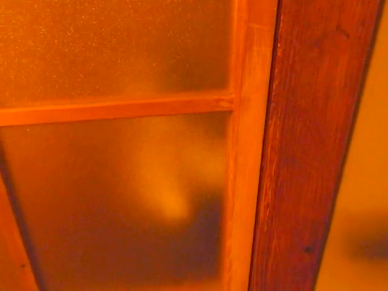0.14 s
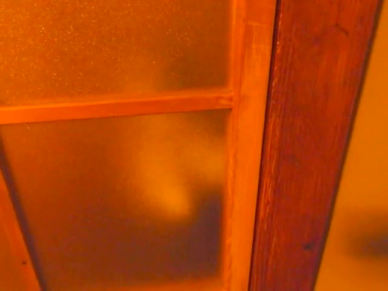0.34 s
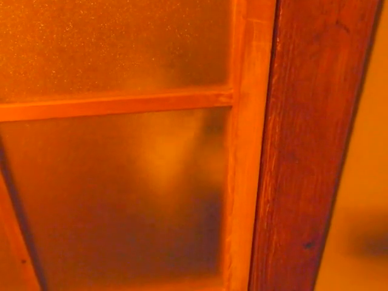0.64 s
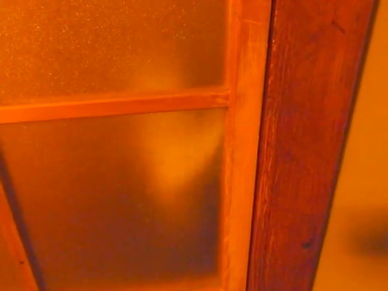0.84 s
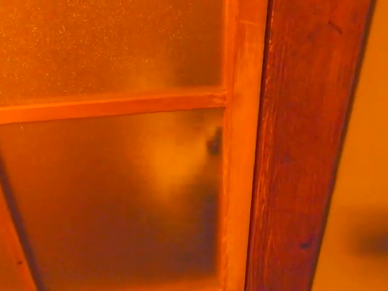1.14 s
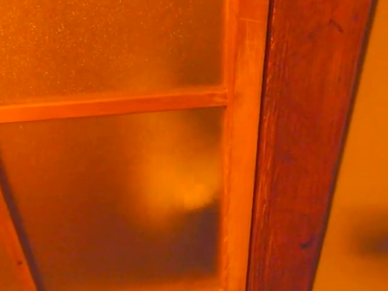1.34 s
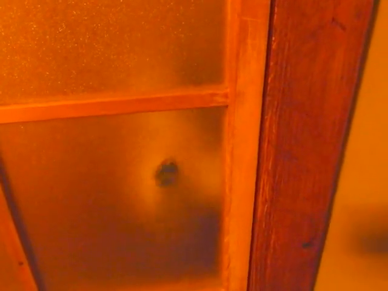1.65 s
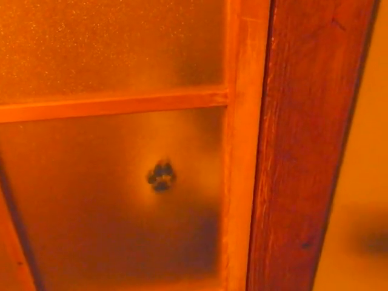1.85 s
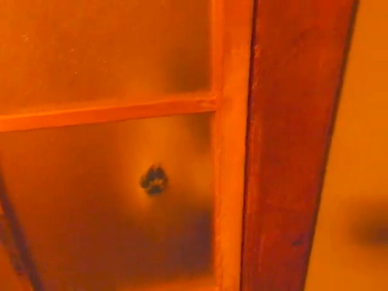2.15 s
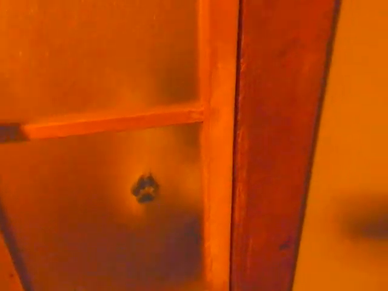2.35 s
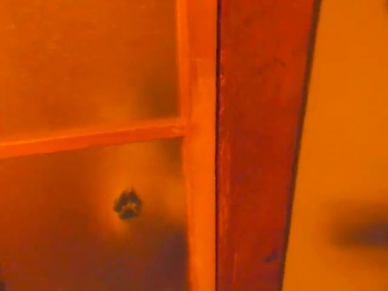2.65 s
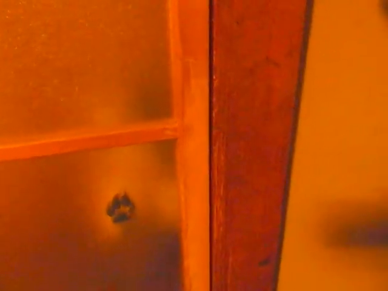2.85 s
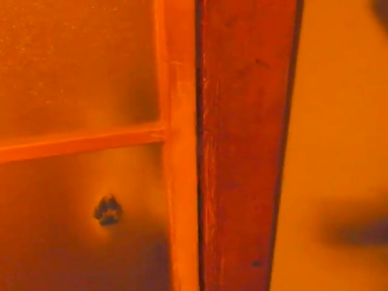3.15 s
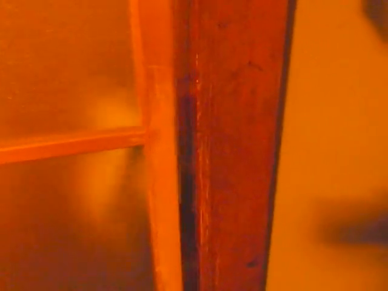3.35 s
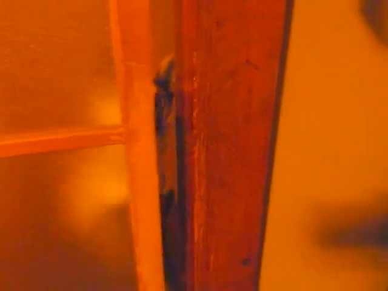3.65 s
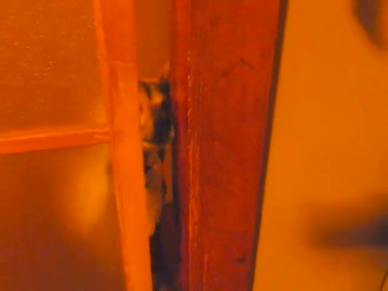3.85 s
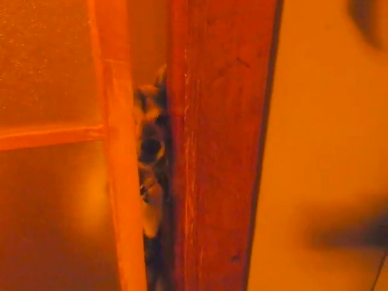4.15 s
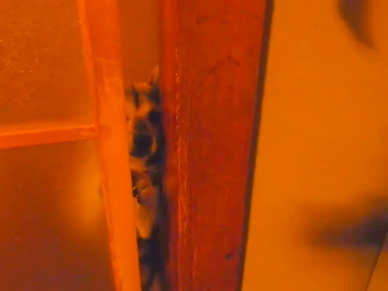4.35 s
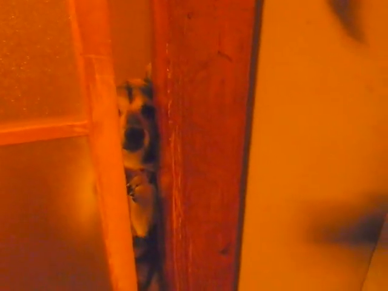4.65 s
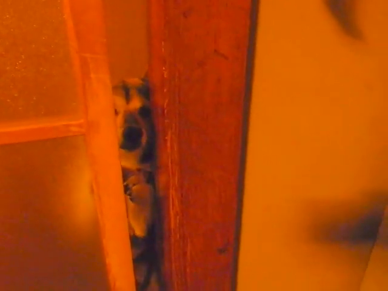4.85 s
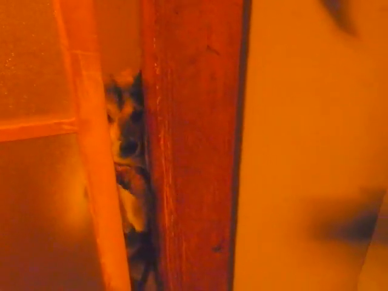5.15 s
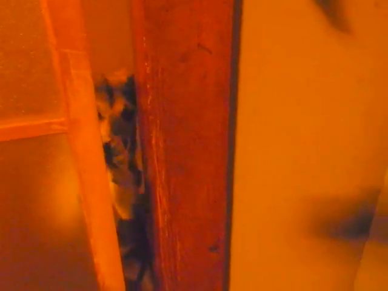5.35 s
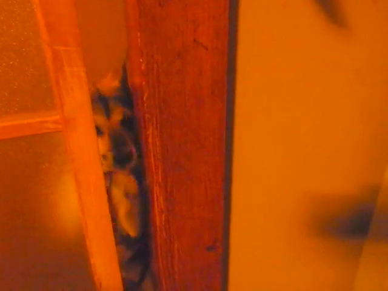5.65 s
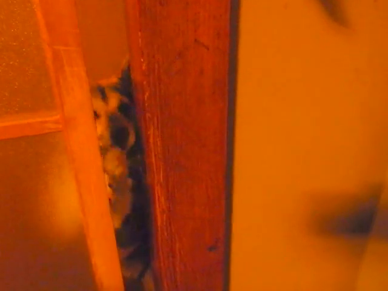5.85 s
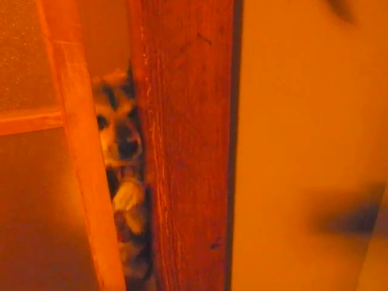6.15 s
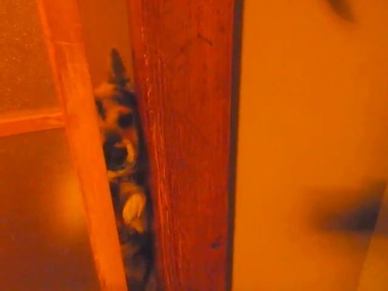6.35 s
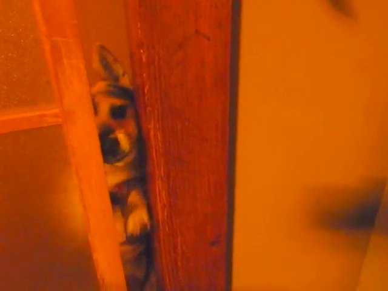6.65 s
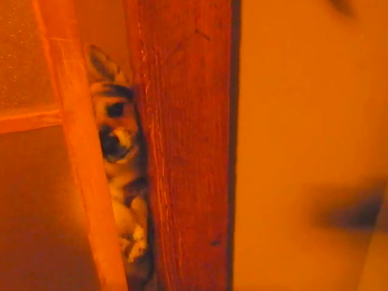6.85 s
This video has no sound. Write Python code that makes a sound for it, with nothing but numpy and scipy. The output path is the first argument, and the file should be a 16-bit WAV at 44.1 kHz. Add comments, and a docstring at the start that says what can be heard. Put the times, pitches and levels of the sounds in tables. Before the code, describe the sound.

Indoors and close to the microphone, a wooden sliding door with loose glass panes is pawed by a small dog. A tiny squeak and claw scrape accompany a busy run of rattles and clacks, then one short jolt, a pause, and the heaviest shove with low thump and juddering slide. After a second quiet gap come softer rubs and a few light knocks over low room tone.

```python
"""A wooden sliding door with loose glass panes is pawed at and shoved open in bursts by a small dog, in a quiet room.
Uneven jolts, driven by each push, ring the damped modes of the swaying leaf, the juddering wood and the panes.
Noise bursts clack on the same wood and glass, a paw pad squeaks in overtones and claws scrape as narrow noise.
Placed close to two neighbouring microphone ports, over a steady room tone, with short reflections behind."""
import sys
import numpy as np
from scipy import signal
from scipy.fft import rfft, irfft
from scipy.io import wavfile
from scipy.ndimage import uniform_filter1d

SR = 44100
rng = np.random.default_rng(int(sys.argv[2]) if len(sys.argv) > 2 else 0)


def wav_out(sig):
    """Save sig, one row per channel (or a flat mono array), as 16-bit PCM at SR to the path in sys.argv[1]."""
    wavfile.write(sys.argv[1], SR, np.round(np.clip(np.atleast_2d(sig).T, -1, 1) * 32767).astype(np.int16))


N = 308259

# room tone before it is set to its overall level: [pitch_hz, relative_level_db]
AIR_SPECTRUM = [(25, -3.5), (117, 2.5), (335, -16.5), (372, -7), (410, -15), (2110, -25.5), (5000, -32),
                (6380, -42.5), (16000, -53.5)]
# likeness of the room tone at the two ports: [pitch_hz, likeness_0_to_1]
AIR_LIKENESS = [(60, 0.79), (950, 0.48), (15000, 0.45)]
AIR_RMS_DB = -51.5

# pushes on the door: [start_s, build_up_s, hold_s, sway_of_leaf_db, judder_of_wood_db, chatter_of_panes_db,
# pane_brightness_db_per_octave]; the levels are those reached at the end of the build-up
PUSHES = [(0.577, 0.26, 0.005, -70, -55.5, -57, 3), (0.793, 0.013, 0.041, -27, -39, -46.5, 4),
          (0.82, 0.11, 0.12, -26, -26.5, -30.5, -2), (1.062, 0.037, 0.095, -35, -34, -31, -5),
          (1.142, 0.18, 0.067, -29, -34.5, -39.5, 1.3), (1.41, 0.0042, 0.11, -25, -25, -31.5, -5.5),
          (1.687, 0.068, 0.15, -44, -49, -58.5, 1), (1.918, 0.011, 0.08, -33, -40.5, -55.5, -9),
          (2.325, 0.0049, 0.026, -29, -29.5, -37, -9), (2.325, 0.044, 0.0025, -30, -20.5, -23.5, -1.5),
          (3.221, 0.16, .003, -38, -49, -49.5, 0), (3.34, 0.017, 0.22, -27, -25, -29, -0.8),
          (3.583, 0.067, 0.033, -27.5, -35.5, -42.5, -3), (3.64, 0.19, 0.041, -37, -33.5, -35, -0.4),
          (3.885, 0.028, 0.24, -34.5, -42.5, -55, -1.5), (4.108, 0.11, 0.069, -42.5, -51.5, -54.5, -0.5),
          (5.137, 0.17, 0.034, -48.5, -59, -60, -1), (5.405, 0.1, 0.18, -34, -43, -45.5, 3.5),
          (5.665, 0.27, 0.033, -42.5, -46, -50, 4.5), (5.912, 0.15, 0.33, -37, -45.5, -52.5, 2.5),
          (6.414, 0.081, 0.075, -40, -54.5, -69.5, 5), (6.725, 0.026, 0.021, -55, -70, -53, 0.5),
          (6.765, 0.0057, 0.01, -59, -55, -43.5, -1)]
BUILD_DB = 10  # climb during the build-up
# the next five rows each hold three values: leaf, wood, panes
SAG_DB_PER_S = (9, 29.5, 33)  # weakening while the push is held
LET_GO_DB_PER_S = (168, 234, 254.5)  # first quick fall when the paw lets go
SETTLE_DB = (-10, -27, -21)  # where the slower rocking to rest begins, relative to the push
SETTLE_DB_PER_S = (31.5, 135, 188)  # fall of that rocking
REST_DB = (-95, -66.5, -71.5)  # faint constant trembling
REST_BRIGHT_DB = -4.5  # pane brightness of the trembling, dB per octave

# bending modes of the door leaf: [pitch_hz, width_hz, level_db]
LEAF_MODES = [(59.5, 14.7, 0.5), (78.5, 15.4, 0), (113.5, 17, -2.5), (169, 69, -6.5)]
# modes of the wooden bars: [pitch_hz, width_hz, level_db]
WOOD_MODES = [(229, 151, 2), (372, 67.6, 4), (617, 230, -0.5), (902, 292, -4), (1112, 280, -8)]
# modes of the glass panes: [pitch_hz, width_hz, level_db]
PANE_MODES = [(1360, 216, 4), (1745, 323, 4.5), (2052, 260, 6.5), (2375, 324, 5.5), (2955, 554, 3),
              (3604, 400, 3), (4100, 510, -1), (4650, 330, 0), (5280, 420, -2), (5840, 450, -3),
              (6910, 960, -8), (9570, 2600, -16), (12160, 3900, -23)]
LINGER, LINGER_DB = 3, -16  # each mode has a core up to this many times narrower that rings on, and its level
RUB_DB, KNOCK_DB = -51.5, -34  # panes rub smoothly under the first chatter level, knock loosely over the second
# the dog rubs the edge of the door once it stands ajar, which recolours wood and panes: [pitch_hz, gain_db]
RUB_TONE = [(650, -0.5), (1000, -5), (1345, 8.5), (2800, 0), (4650, -2)]
AJAR_S = 5

# short, narrow scrapes of claw on glass: [start_s, length_s, centre_hz, width_hz, level_before_shaping_db]
SCRAPES = [(0.327, 0.053, 3220, 500, -61), (1.082, 0.078, 2990, 490, -29)]
# wet paw pad on glass: [time_s, slip_rate_hz, level_db], before the random wobble of both
SQUEAK_PATH = [(0.671, 1180, -59), (0.683, 1160, -50.5), (0.712, 1142, -46), (0.727, 946, -47.5),
               (0.756, 932, -47), (0.772, 870, -60)]
# strength of the squeak's overtones: [pitch_hz, level_db]
SQUEAK_TONE = [(1100, 1), (2100, -19), (2800, -3.5), (5500, -17), (5800, 0), (8000, -23.5)]

# clacks of pane, claw and frame, peaks as struck:
# [start_s, peak_db, body_at_1200_hz_and_below_db, edge_at_9000_hz_and_above_db, favoured_ring_hz]
CLACKS = [(0.7975, -24, -0.5, 9, 3110), (0.83, -25.5, 0, -4, 4640), (0.854, -23, 9, -8, 1690),
          (0.869, -30, -26, 7, 7400), (0.8904, -15, 1, -3, 2840), (0.9737, -11.5, -34, 2, 1660),
          (1.187, -13.5, -58, 2.5, 4380), (1.205, -25, -23.5, 10, 4280), (1.2439, -18, -62, 10.5, 5670),
          (1.2837, -22, 17, -20, 2860), (1.328, -29.5, -8, -15, 3400), (1.358, -21.5, -18, -15, 4000),
          (1.4064, -11, 10, -46, 2850), (1.491, -18, -15, -7, 1650), (1.752, -44, 17, 4, 1710),
          (1.8028, -33, -29, 9, 5600), (1.932, -35.5, 15, -9, 1570), (2.3283, -29, 2, -15, 1290),
          (2.357, -15, 25, -16, 724), (2.4995, -32.5, -6, 3, 3300), (2.88, -44, 4, 13.5, 2770),
          (2.994, -46.5, -22, 17, 2710), (3.3463, -15.5, -10, 10.5, 3200), (3.5162, -9, -35, 5, 2000),
          (3.6446, -22, 1, -7, 1230), (3.842, -14.5, 0.5, 8.5, 5230), (3.8485, -11, -28, 5, 5000),
          (3.894, -23.5, -28, -3, 1580), (4.14, -37, -43, 11.5, 3920), (5.253, -38, -11, -16, 4520),
          (5.5255, -16, -12, -5, 1860), (6.12, -23.5, 7.5, -24, 2680), (6.269, -22.5, 2, -31, 4740),
          (6.2772, -14.5, -4, -6, 5300), (6.769, -28.5, 0, -46, 3060), (6.786, -24, 6, -43, 2200)]
# sudden pushes that thump the whole leaf: [start_s, starting_level_db]
SHOVES = [(0.81, -23), (2.383, -13.5), (3.347, -7)]

# decay of the room's reflections: [pitch_hz, t60_s]
ROOM_DECAY = [(300, 0.39), (14000, 0.0056)]
# colour of the reflections heard oppositely at the two ports: [pitch_hz, gain_db]
PORT_DIFFERENCE = [(300, -49), (2000, -37.5), (4500, -17), (8000, -1.5), (15000, 3)]
# lean of the door group to the left: [pitch_hz, left_minus_right_db]
LEFT_LEAN = [(3500, 0.43), (9000, 3)]
NOTCH_HZ, NOTCH_Q = 2490, 15.4  # narrow dip of the microphone
BAND_EDGE_HZ = 16200


def gain_of(db):
    """Decibels to gain."""
    return 10 ** (np.asarray(db) / 20)


def evened(x):
    """Scales to rms 1."""
    return x / np.sqrt(np.mean(x ** 2) + 1e-20)


def read(points, hz):
    """Reads a spectrum table on a log-frequency axis."""
    f, value = np.transpose(points)
    return np.interp(np.log(hz + 1), np.log(f + 1), value)


def add(mix, s, sound):
    """Mixes a sound in at time s."""
    part = mix[round(s * SR):][:len(sound)]
    part += sound[:len(part)]


def coloured(x, points):
    """Applies a (Hz, dB) table along the last axis."""
    hz = np.fft.rfftfreq(x.shape[-1], 1 / SR)
    return irfft(rfft(x) * gain_of(read(points, hz)), x.shape[-1])


def room_tone():
    """Steady air and house rumble: shaped noise with slight drifting patches, partly alike in both ports."""
    frames, hz = N // 512 + 5, np.fft.rfftfreq(2048, 1 / SR)
    a, b, c, d, patches = rng.standard_normal((frames, 1025, 5)).T
    patches = uniform_filter1d(patches, size=20, axis=0)
    patches = evened(uniform_filter1d(patches, size=8, axis=1))
    same = np.clip(read(AIR_LIKENESS, hz), -1, 1)[:, None]
    left = a + 1j * b
    right = same * left + np.sqrt(1 - same ** 2) * (c + 1j * d)
    spectra = np.array([left, right]) * gain_of(read(AIR_SPECTRUM, hz)[:, None] + 1.5 * patches)
    air = signal.istft(spectra, nperseg=2048, noverlap=1536)[1][:, :N]
    return gain_of(AIR_RMS_DB) * evened(air)


def motion():
    """Adds the power of pushes that build, hold, let go and settle; the loudest chatter sets the brightness."""
    t = np.arange(0, N / SR + .01, .001)[:, None]
    power = gain_of(2 * np.array(REST_DB))[None]
    bright = REST_BRIGHT_DB * power[:, 2]
    for start, build, hold, *levels_db, bright_db in PUSHES:
        climb = (t - start) / build
        held = np.clip(t - start - build, 0, hold)
        since = np.maximum(t - start - build - hold, 0)
        let_go = gain_of(-since * LET_GO_DB_PER_S)
        settling = gain_of(SETTLE_DB - since * SETTLE_DB_PER_S)
        fall = let_go + settling * (1 - let_go)
        pressed_db = levels_db - BUILD_DB * (1 - np.clip(climb, 0, 1)) - held * SAG_DB_PER_S
        push = (climb > 0) * (gain_of(pressed_db) * fall) ** 2
        power = power + push
        bright = bright + bright_db * push[:, 2]
    curves = (*np.sqrt(power.T), bright / power[:, 2])
    return [np.interp(np.arange(N) / SR, t[:, 0], curve) for curve in curves]


def jolts(per_s, spread_db, spray_s, hiss, loose):
    """Uneven small impacts, each a quickly dying spray, over rubbing noise; loose=0 leaves an even rub."""
    size = gain_of(spread_db * np.minimum(rng.exponential(1, N), 4)) * (rng.random(N) < per_s / SR)
    sprays = signal.lfilter([1], [1, -np.exp(-1 / (spray_s * SR))], size)
    impacts = evened(sprays) + hiss
    return (loose * evened(impacts) + 1 - loose) * rng.standard_normal(N)


def drift(modes, depth_db, size):
    """Narrow modes swell and fade at random as the contact points wander; broad ones hold steadier."""
    steps = uniform_filter1d(rng.standard_normal((N // 64 + 2, len(modes))), size=size, axis=0)
    at = np.arange(N) / 64  # one random step every 64 samples
    return [np.interp(at, np.arange(len(v)), depth_db * min(1, 400 / w) * evened(v))
            for v, (hz, w, db) in zip(steps.T, modes)]


def ring(x, modes, shades_db, linger_db=LINGER_DB):
    """Drives each damped mode with x times its own gain; an rms of 1 in gives about 1 out."""
    t, out, energy = np.arange(5000) / SR, 0, 0
    for k, ((hz, w, db), shade_db) in enumerate(zip(modes, shades_db)):
        core = gain_of(linger_db) / LINGER * np.exp(-np.pi * max(w / LINGER, 14) * t)
        dying = np.exp(-np.pi * w * t) + core
        mode = (-1) ** k * gain_of(db) * w * dying * np.sin(2 * np.pi * hz * t)
        out = out + signal.oaconvolve(x * gain_of(shade_db), mode)[:len(x)]
        energy += np.sum(mode ** 2)
    return out / np.sqrt(energy)


def door():
    """Jolts in the track shake the leaf and its wooden bars, and ticks in the grooves shake its panes."""
    sway, judder, chatter, bright_db = motion()
    ajar = np.arange(N) > AJAR_S * SR
    loose = np.interp(20 * np.log10(chatter), (RUB_DB, KNOCK_DB), (0, 1))
    bumps = jolts(per_s=220, spread_db=2.2, spray_s=0.0015, hiss=1.2, loose=loose)
    ticks = jolts(per_s=260, spread_db=2.8, spray_s=0.0012, hiss=0.7, loose=loose)  # loose panes knock
    pane_shades = [d + bright_db * np.log2(hz / 2800) + ajar * read(RUB_TONE, hz)
                   for d, (hz, w, db) in zip(drift(PANE_MODES, depth_db=2.5, size=16), PANE_MODES)]
    wood_shades = [d + ajar * read(RUB_TONE, hz)
                   for d, (hz, w, db) in zip(drift(WOOD_MODES, depth_db=2.5, size=20), WOOD_MODES)]
    leaf = ring(sway * bumps, LEAF_MODES, drift(LEAF_MODES, depth_db=2.0, size=60))
    wood = ring(judder * bumps, WOOD_MODES, wood_shades)
    panes = ring(chatter * ticks, PANE_MODES, pane_shades)
    return leaf, wood + panes


def claw_scrapes():
    """Claws scrape the glass: low noise shifted up to a narrow band, swelling and fading."""
    out = np.zeros(N)
    for s, length, centre_hz, width_hz, db in SCRAPES:
        n = int(length * SR)
        lowpass = signal.butter(3, width_hz / SR, output="sos")
        fuzz = signal.sosfilt(lowpass, rng.standard_normal(8192))
        carrier = np.sin(2 * np.pi * centre_hz * np.arange(n) / SR)
        add(out, s, gain_of(db) * evened(fuzz[-n:]) * carrier * np.hanning(n))
    return out


def pad_squeak():
    """Regular stick-slip of the paw pad on glass gives a stack of overtones with unsteady pitch and level."""
    out, (s, hz, db) = np.zeros(N), np.transpose(SQUEAK_PATH)
    t = np.arange(s[0], s[-1], 1 / SR)
    wobble = 1 + 0.07 * uniform_filter1d(rng.standard_normal(len(t)), size=150)
    pitch = np.interp(t, s, hz) * wobble
    turns = np.cumsum(pitch) / SR
    stack = sum(gain_of(read(SQUEAK_TONE, k * pitch)) * np.cos(2 * np.pi * k * turns) for k in range(1, 13))
    flutter_db = 2.6 * evened(uniform_filter1d(rng.standard_normal(len(t)), size=90))
    level = gain_of(np.interp(t, s, db) + flutter_db)
    add(out, s[0], level * stack * signal.windows.tukey(len(t), .1))
    return out


def clacks():
    """A tick, a short crack and a fading spray of rebounds ring wood and glass, favouring modes near one pitch."""
    out, t = np.zeros(N), np.arange(8192) / SR
    sprays = rng.standard_normal((len(CLACKS), len(t)))
    fade = np.exp(-t / 0.0096) + gain_of(-18.5 - 60 * t / 0.33)  # crack, then rebounds
    for (s, db, body_db, edge_db, loud_hz), spray in zip(CLACKS, sprays):
        tilt = [(1200, body_db), (2500, 0), (6000, 0.022), (9000, edge_db)]  # (Hz, dB)
        struck = WOOD_MODES + PANE_MODES + [(loud_hz, 250, 0)]
        hz = np.transpose(struck)[0]
        favour_db = 5 * np.exp(-(np.log(hz / loud_hz) / 0.2) ** 2)
        tick = 14 * (t == 0)
        sound = ring(spray * fade + tick, struck, read(tilt, hz) + favour_db, linger_db=-50)
        add(out, s, gain_of(db) * sound / abs(sound).max())
    return out


def thumps():
    """A sudden push thumps the whole leaf: a 50 Hz sine that falls 60 dB in 27 ms."""
    out, t = np.zeros(N), np.arange(8192) / SR
    for s, db in SHOVES:
        add(out, s, gain_of(db - 60 * t / 0.027) * np.sin(2 * np.pi * 50 * t))
    return out


def room(x):
    """Sparse reflections of random sign, each band dying at its own speed."""
    taps = np.zeros(SR // 2)
    at = np.arange(20, len(taps) - 20, 20)
    taps[at + rng.integers(0, 20, len(at))] = rng.choice([-1., 1.], len(at))
    hz, t, z = signal.stft(taps, SR, nperseg=256)
    decay = gain_of(-60 * t / read(ROOM_DECAY, hz)[:, None])
    tail = signal.istft(z * decay, SR, nperseg=256)[1]
    return signal.fftconvolve(x, tail / np.linalg.norm(tail))[:N]


def scene():
    """Places the door group close to two ports that differ mostly in the treble, over the room tone."""
    air = room_tone()
    leaf, frame = door()
    near = frame + claw_scrapes() + pad_squeak() + clacks() + thumps()
    mid = near + gain_of(-8.5) * room(near) + leaf  # the leaf itself stays dry
    # the sounding spot wanders, so its reflections keep changing, here in a cycle of 3.5 Hz
    turn = 2 * np.pi * 3.5 * np.arange(N) / SR
    side = coloured(room(near * np.cos(turn)) + room(near * np.sin(turn)), PORT_DIFFERENCE)
    left_tone, right_tone = [[(hz, sign * db / 2) for hz, db in LEFT_LEAN] for sign in (1, -1)]
    return np.array([coloured(mid + side, left_tone), coloured(mid - side, right_tone)]) + air


def record(dry):
    """The microphone's narrow dip, then the band limit."""
    dipped = signal.lfilter(*signal.iirnotch(NOTCH_HZ, NOTCH_Q, SR), dry)
    lowpass = signal.firwin(511, BAND_EDGE_HZ, window=("kaiser", 9), fs=SR)
    return signal.oaconvolve(dipped, lowpass[None], "same")


dry = scene()
out = record(dry)
wav_out(out)
```